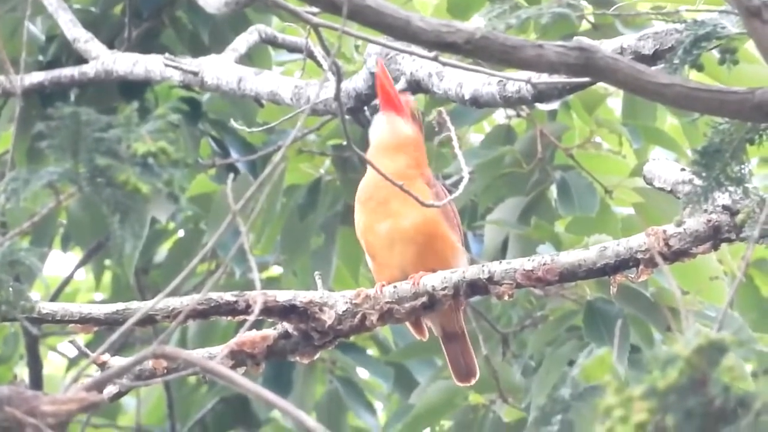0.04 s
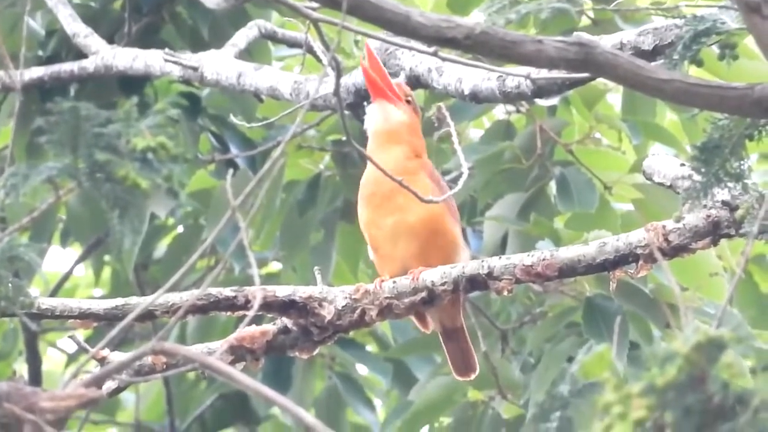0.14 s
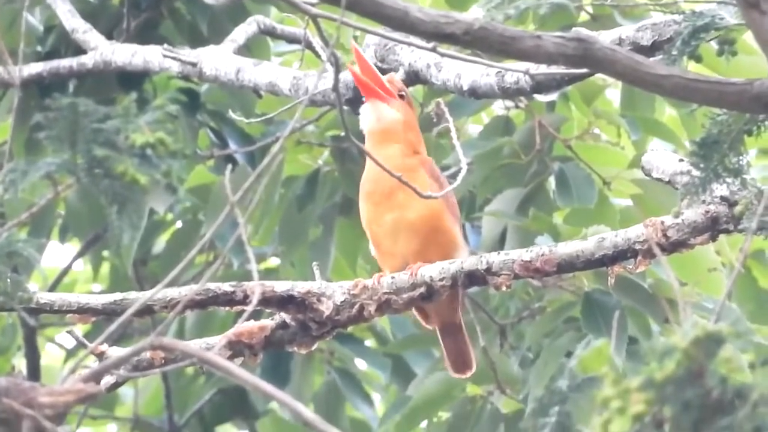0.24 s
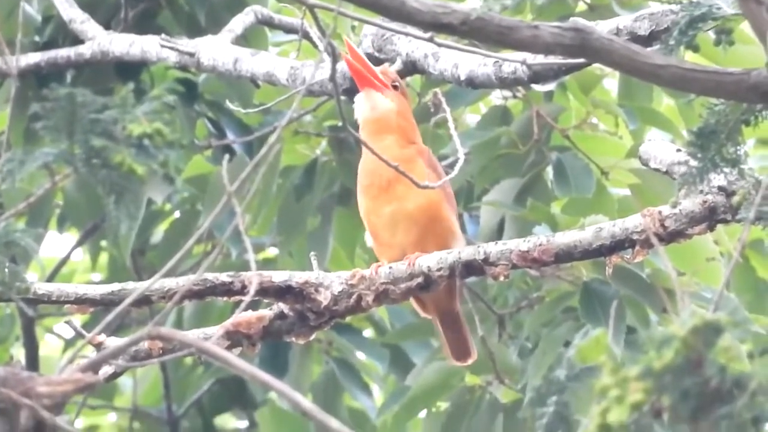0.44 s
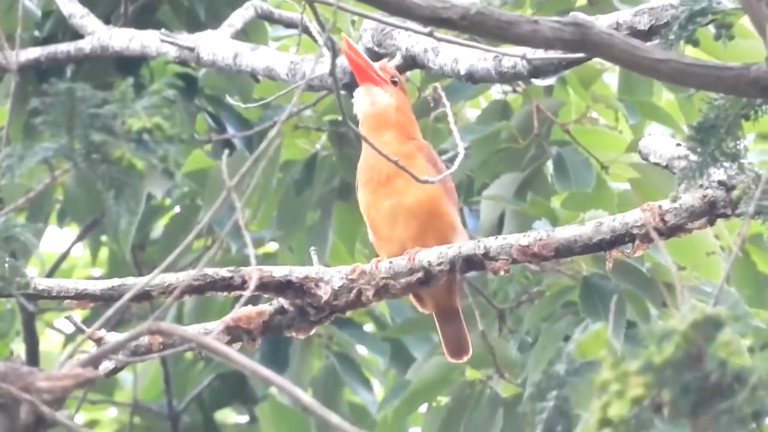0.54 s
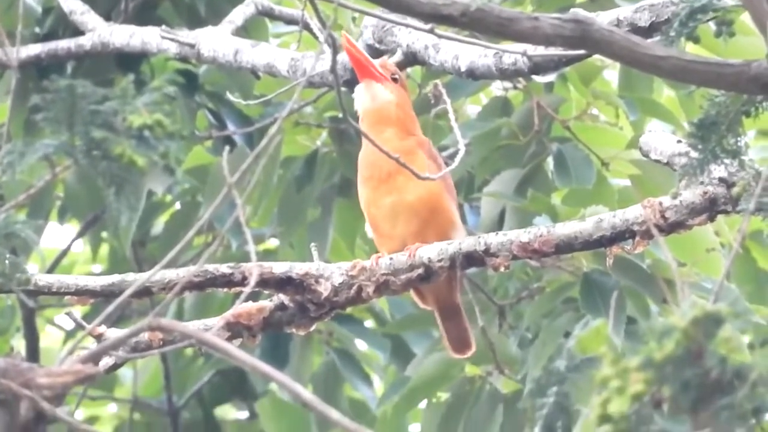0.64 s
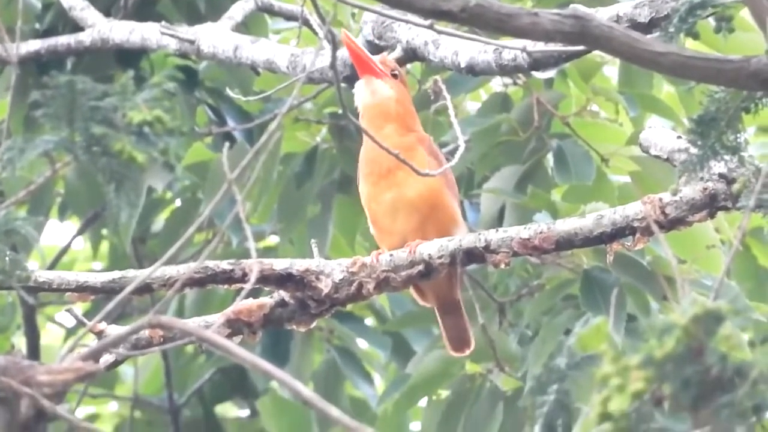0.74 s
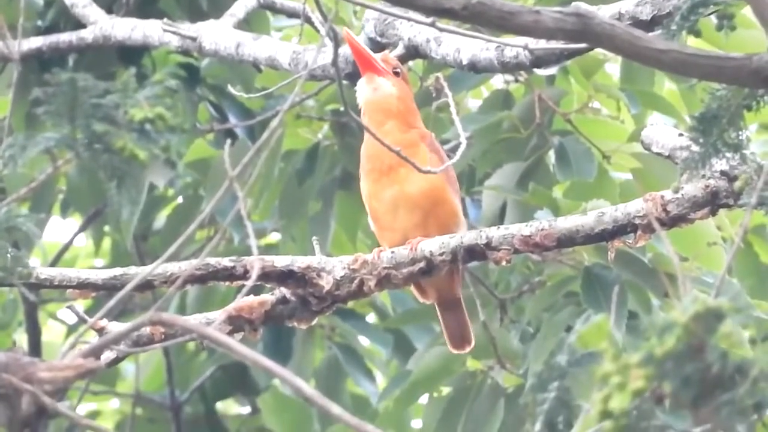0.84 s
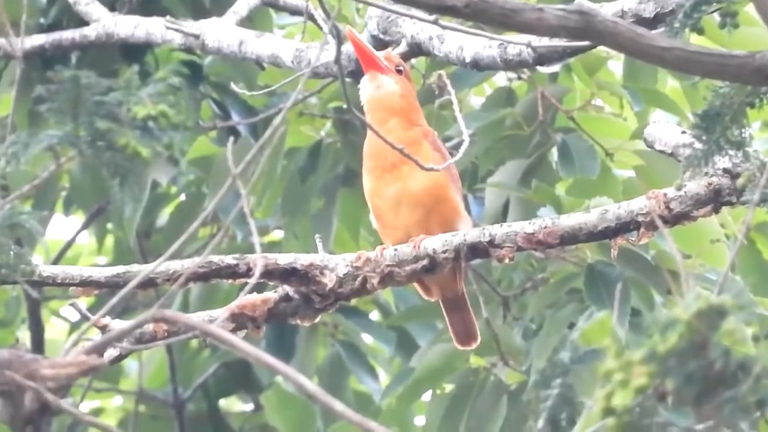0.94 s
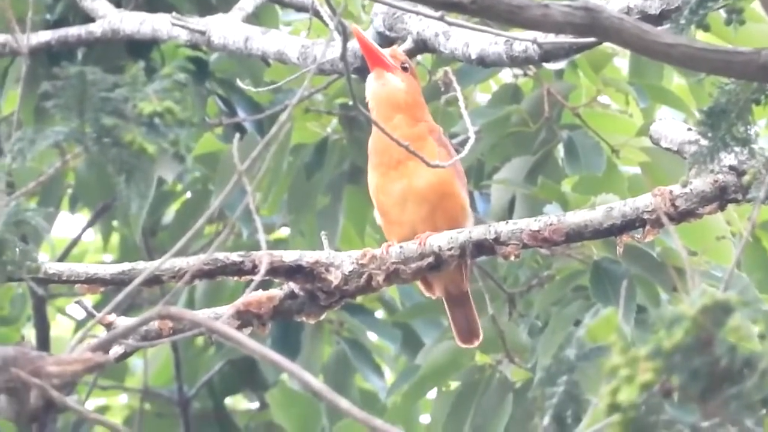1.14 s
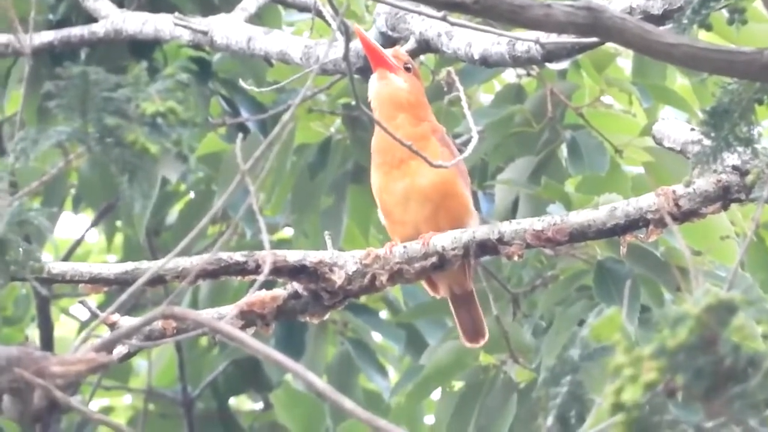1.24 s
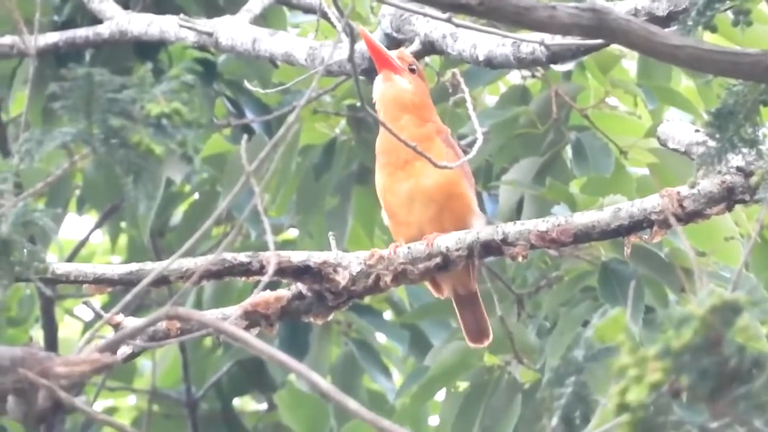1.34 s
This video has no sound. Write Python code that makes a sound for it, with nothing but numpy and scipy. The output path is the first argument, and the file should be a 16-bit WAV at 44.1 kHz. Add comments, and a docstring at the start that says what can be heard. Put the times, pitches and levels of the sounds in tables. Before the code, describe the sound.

A kingfisher's rapid, descending whistled trill echoes softly above leaf hiss and distant rumble.

```python
"""A kingfisher trills in a wood: short arched whistles that quicken, sink in pitch and fade.
The first note is raspy; the last ones break into double pips.
Leaves and trunks scatter the call into a soft tail and a late echo.
Under it all lie a distant rumble and leaf hiss."""
import sys
import numpy as np
from scipy import signal
from scipy.fft import rfft, irfft
from scipy.io import wavfile

SR = 44100
rng = np.random.default_rng(int(sys.argv[2]) if len(sys.argv) > 2 else 0)


def wrap_up_sound(samples):
    """Save the sound to the file named by the first command line argument, as 16-bit audio."""
    columns = np.atleast_2d(samples).T
    # keep every value between -1 and 1, then stretch to whole-number steps
    tamed = np.clip(columns, -1, 1)
    steps = np.round(tamed * 32767).astype(np.int16)
    wavfile.write(sys.argv[1], SR, steps)


N = 61739
TIME_S = np.arange(N) / SR
BIN_HZ = np.arange(N // 2 + 1) * SR / N


def from_db(db):
    """Decibels to gain."""
    return 10 ** (np.asarray(db) / 20)


def rms_one(x):
    """Scale to unit rms."""
    return x / np.sqrt(np.mean(x ** 2) + 1e-20)


def at_hz(points, hz):
    """Interpolate (f/Hz, value) rows on a log-frequency axis."""
    points_hz, values = np.transpose(points)
    return np.interp(np.log(hz + 1), np.log(points_hz), values)


def drift(rate_hz):
    """Smooth random wander, unit rms."""
    pole = np.exp(-2 * np.pi * rate_hz / SR)
    return rms_one(signal.lfilter([1], [1, -2 * pole, pole * pole], rng.standard_normal(2 * N))[N:])


def swell(u, attack=.33, release=.24):
    """Rounded attack, hold and release over u = 0..1."""
    rise, fall = np.sin(np.pi / 2 * np.clip([u / attack, (1 - u) / release], 0, 1))
    return rise * fall


def pan(x, left_db):
    """Mono to stereo, left louder by left_db."""
    return x * from_db([[left_db / 2], [-left_db / 2]])


def delayed(x, lag_s):
    """Fractional delay, constant or varying."""
    return np.interp(np.arange(N) - lag_s * SR, np.arange(N), x)


def coloured(x, response):
    """Filter by (f/Hz, gain/dB) rows."""
    hz = np.arange(N + 1) * SR / (2 * N)
    return irfft(rfft(x, 2 * N) * from_db(at_hz(response, hz)))[..., :N]


def diffuse(spectrum=None):
    """Unit-rms stereo noise from all around: alike in the bass, unrelated in the treble."""
    # left-right likeness: f/Hz, correlation/1
    likeness = [(60, .87), (170, 1), (700, 0.82), (2000, 0.59), (4500, 0.06), (8000, 0), (13000, 0.14)]
    alike = np.clip(at_hz(likeness, BIN_HZ), -1, 1)
    mid, side = rfft(rng.standard_normal((2, N)))
    stereo = np.sqrt(1 + alike) * mid + np.sqrt(1 - alike) * side * [[1], [-1]]
    gain = 1 if spectrum is None else from_db(at_hz(spectrum, BIN_HZ))
    return rms_one(irfft(gain * stereo, N))


def patchy(x, depth_db, rate_hz, span_hz):
    """Each quarter octave in span_hz wanders in level by itself; unit rms."""
    band = np.round(4 * np.log2(np.clip(BIN_HZ, *span_hz)))
    spectrum = rfft(x)
    parts = (irfft(spectrum * (band == k), N) for k in np.unique(band))
    return rms_one(sum(part * from_db(depth_db * drift(rate_hz)) for part in parts))


def rumble():
    """Distant low noise, uneven and slowly swelling."""
    # spectrum: f/Hz, relative density/dB
    spectrum = [(30, -23.5), (90, -18), (125, -12.5), (175, 1), (215, 1.5), (260, -4.5), (320, -2.5),
                (400, -7.5), (560, -6.5), (800, -5), (1200, -12), (2500, -26), (8000, -60)]
    # slow swell: t/s, level/dB
    levels = [(0, -51.5), (.12, -49.5), (.35, -52), (.7, -53.5), (.95, -52), (1.15, -49.5), (1.4, -53)]
    gain = from_db(np.interp(TIME_S, *np.transpose(levels)))
    return gain * patchy(diffuse(spectrum), depth_db=2.8, rate_hz=9, span_hz=(150, 1200))


def leaf_hiss():
    """Softly stirring leaves."""
    # spectrum: f/Hz, relative density/dB
    spectrum = [(400, -34), (1200, -14.5), (1700, -12), (2250, -9), (3300, -15.5), (4300, -9.5),
                (5400, -12), (6500, -13.5), (7200, -19), (10000, -24.5), (12000, -35), (15000, -45)]
    return from_db(-49) * patchy(diffuse(spectrum), depth_db=1.73, rate_hz=16, span_hz=(2000, 7000))


def trill():
    """Arched whistles, some split by a mid-note dip; returns stereo fundamental, mono overtones."""
    # notes: t/s, length/s, top f/Hz, arch/Hz, sag/Hz, harmonics 1, 2, 3 level/dB,
    # flutter/dB, left over right/dB, rise over the note/dB, mid-note dip/dB
    notes = [ (0.19, .045, 2171, -26.5, 126.5, -25.5, -43, -54.5, 1.85, 3.5, 5, 0.5),
             (0.267, .041, 2238, 0.5, 30, -15, -38, -46, 0.2, 0, 6, 0),
             (0.343, 0.036, 2245, 35, 60, -17.5, -36, -44, .5, 0, 3.5, -1),
             (.417, 0.037, 2183, 34, 34, -18, -36.5, -47, 0.85, 4.5, 0.5, 0.5),
             (.491, 0.037, 2122, 31.5, 31.5, -25.5, -48.5, -44, 1.5, 5.5, 2, -1.5),
             (.567, .036, 2032, 130.5, 70, -27.5, -51.5, -40, 2, -4, 15, 9),
             (.634, .04, 1960, 130, 48, -26.5, -58, -43, 2, -4.5, 1.5, 2.5),
             (0.702, .037, 1910, 46.5, 18, -21, -61, -39.5, 0.86, -2, 2, 0.5),
             (0.771, .029, 1865, 57, 8, -21.5, -61, -37.5, 1.5, 1.5, 1, 0),
             (0.838, .031, 1824, 46, -25, -26, -68, -37.5, 1.88, 1, 2.5, -1),
             (.906, 0.027, 1801, 28.5, 1, -26.5, -72, -32, 1, 0, -4, 3.5),
             (.971, .022, 1765, 44, -18, -29.5, -57, -33.5, 1, 5, -6.5, 0.5),
             (1.034, 0.027, 1750, 150.5, 60.5, -32.5, -64, -46, 3, 2.5, -6.5, 7.5),
             (1.083, .034, 1737, 166, -61, -32.5, -66, -45.5, 2, -3, -1, 0),
             (1.145, .034, 1700, 200, 3, -38, -62, -48, 0.5, 0, -1, 6.5),
             (1.207, 0.031, 1668, 288.5, -19.5, -32.5, -71, -50.5, 1.5, 1.5, -6.5, 11),
             (1.266, .03, 1650, 289, -11, -36, -60, -50, 1.5, 3.5, -5, 14.5),
             (1.321, 0.03, 1626, 262, 7.5, -35, -59, -54, 1, 2, 3.5, 14.5),
             (1.379, .03, 1616, 159.5, -26, -36, -63, -63, 1.5, 2, -0.5, 2)]
    # faint top harmonics: multiple, level re mean of harmonics 1 and 3/dB
    top_harmonics = [(4, -25), (5, -41), (6, -42.5), (7, -58)]
    # their further colouring: f/Hz, gain/dB
    top_colour = [(7000, -5), (7600, 2.5), (9000, 0), (10000, -1), (10900, 7), (11500, 6), (12400, -2)]
    # rough noise around each note: f/Hz, relative density/dB
    note_noise = [(1200, -25.5), (1500, -3), (1650, -14), (1850, 4.5), (2200, 2), (2550, -5.5), (2900, -9),
                  (3400, -12), (4500, -8), (6000, -11), (7300, -19), (8800, -17.5), (11000, -30),
                  (13000, -43.5)]
    # how the fundamental carries through the trees: f/Hz, gain/dB
    carry = [(1350, -2.5), (1450, -2.5), (1525, 5), (1580, -2.5), (1650, -6), (1720, -4.5), (1780, -1),
             (2300, -1.5)]
    overtone_arch_max_hz, end_slur_hz = 36, 70.5
    hoarse_until_s, hoarse_db, noise_db = .32, -43, -26.5
    low, high, effort = np.zeros((2, N)), np.zeros(N), np.zeros(N)
    waver, flutter, grit = .0043 * drift(220), drift(182), .0022 * drift(220)
    for (start_s, length_s, top_hz, arch_hz, sag_hz, first_db, second_db, third_db,
         flutter_db, left_db, rise_db, dip_db) in notes:
        i = np.flatnonzero((TIME_S >= start_s) & (TIME_S < start_s + length_s))
        u = (TIME_S[i] - start_s) / length_s
        # rows: fundamental, overtones (flatter arch, extra jitter)
        droop_hz = np.outer([arch_hz, min(arch_hz, overtone_arch_max_hz)], np.abs(2 * u - 1) ** 2.21)
        hz = top_hz - droop_hz - sag_hz * (u - .5) - end_slur_hz * u ** 10.6
        jitter = flutter_db * waver[i] + np.outer([0, 1], grit[i])
        phase, overtone_phase = 2 * np.pi * np.cumsum(hz * (1 + jitter), axis=1) / SR

        shape = swell(u)
        tremble = np.sqrt(2) * from_db(flutter_db * flutter[i])
        contour_db = rise_db * (u - .5) - dip_db * np.exp(-((u - .5) / .2) ** 2)
        envelope = tremble * shape * from_db(contour_db)
        tone = from_db(first_db) * np.sin(phase)
        if start_s < hoarse_until_s:
            tone += from_db(hoarse_db) * np.sin(1.5 * phase)
        low[:, i] += pan(envelope * tone, left_db)
        effort[i] += envelope * from_db(first_db)

        mean_db = (first_db + third_db) / 2
        harmonics = [(2, second_db), (3, third_db)]
        harmonics += [(k, mean_db + db + at_hz(top_colour, k * top_hz)) for k, db in top_harmonics]
        overtones = sum(from_db(db) * np.sin(k * overtone_phase) for k, db in harmonics)
        high[i] += tremble * shape ** .74 * overtones
    high += from_db(noise_db) * effort * diffuse(note_noise)[0]
    return coloured(low, carry), delayed(high, lag_s=.012)


def rasp():
    """The voice breaks on the first note: short falling partials in a crackly noise burst."""
    # burst spectrum: f/Hz, relative density/dB
    spectrum = [(1500, -20.5), (2500, -4), (3300, -1.5), (4400, -1.5), (5000, -1.5), (5600, -7), (7200, -9),
                (8500, -3), (10600, -14), (13000, -37.5)]
    # rough partials: t/s, length/s, f/Hz, level/dB
    partials = [(.195, .042, 3290, -45), (.204, .014, 5550, -41), (.205, 0.033, 4390, -40),
                (.212, 0.029, 8680, -52), (.218, 0.015, 5420, -45.5), (.222, .012, 3770, -40.5)]
    burst_start_s, burst_length_s, fall_per_s = .2016, .048, 1.7
    crackle = from_db(-41 + 2 * drift(rate_hz=200))
    burst = swell((TIME_S - burst_start_s) / burst_length_s, attack=.16, release=.4)
    out = crackle * diffuse(spectrum)[0] * burst
    for start_s, length_s, hz, db in partials:
        age_s = TIME_S - start_s
        slide = 1 - fall_per_s * (age_s - length_s / 2) + .008 * drift(rate_hz=500)
        phase = 2 * np.pi * np.cumsum(hz * slide) / SR
        out += from_db(db) * np.sqrt(2) * np.sin(phase) * swell(age_s / length_s)
    return out


def scatter(x, delay_s, build_s, t60_s):
    """A cloud of small echoes that builds up and dies away."""
    age_s = np.maximum(TIME_S - delay_s, 0)
    envelope = (1 - np.exp(-age_s / build_s)) * from_db(-60 * age_s / t60_s)
    echoes = rms_one(diffuse() * envelope) / np.sqrt(N)
    return signal.fftconvolve(x[None], echoes, axes=1)[:, :N]


def wood(low, high):
    """Scatter from near leaves and deeper trunks; a late echo from far trees."""
    # leaves, trunks: delay/s, build-up/s, t60/s, fundamental gain/dB, overtone gain/dB
    scatterers = [(.008, 0.01, 0.12, -13, -6), (0.028, 0.016, 1.0, -15, -8.5)]
    # colour of the distinct reflection: f/Hz, gain/dB
    echo_colour = [(1800, -6.5), (1950, -4.5), (2200, -1)]
    out = scatter(from_db(-18) * low + from_db(-20.5) * high, delay_s=.245, build_s=.0059, t60_s=.39)
    echo_lag_s = .256 + 70e-6 * drift(rate_hz=90)   # wavering delay roughens the echo
    echo = delayed(coloured(low, echo_colour), echo_lag_s)
    out += pan(from_db(-17) * echo, left_db=-2)
    for delay_s, build_s, t60_s, low_db, high_db in scatterers:
        out += scatter(from_db(low_db) * low + from_db(high_db) * high, delay_s, build_s, t60_s)
    return out


def scene():
    """The bird, slightly left, with its echoes, over rumble and leaves."""
    low, high = trill()
    high = high + rasp()
    left, right = low + pan(high, left_db=-.5)
    direct = np.array([left, delayed(right, lag_s=30e-6)])
    return direct + wood(low.mean(axis=0), high) + rumble() + leaf_hiss()


def record(dry):
    """Steep low-pass."""
    stop_hz, stop_db = 15000, 70
    return signal.sosfilt(signal.cheby2(12, stop_db, stop_hz, fs=SR, output="sos"), dry)


dry = scene()
out = record(dry)
wrap_up_sound(out)
```